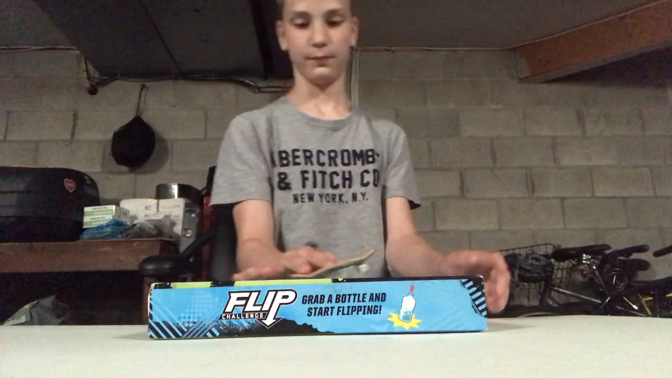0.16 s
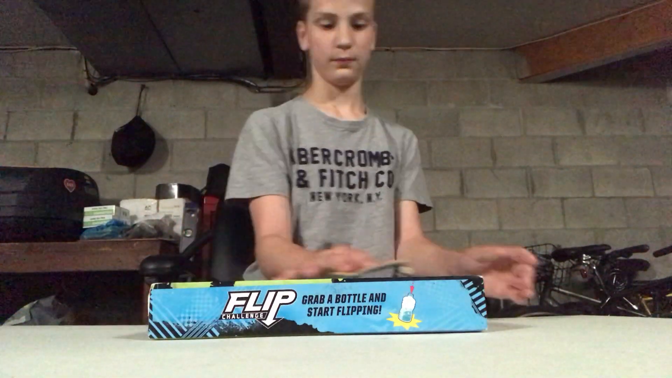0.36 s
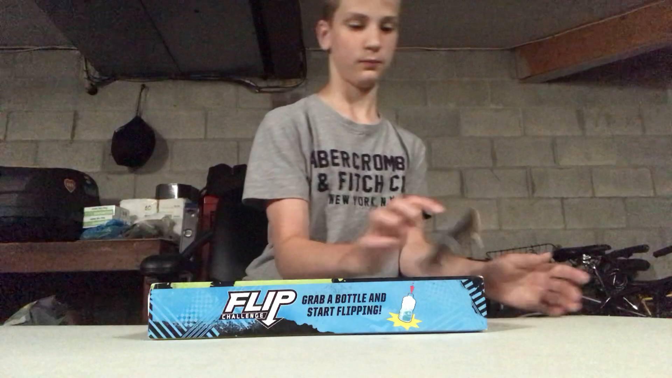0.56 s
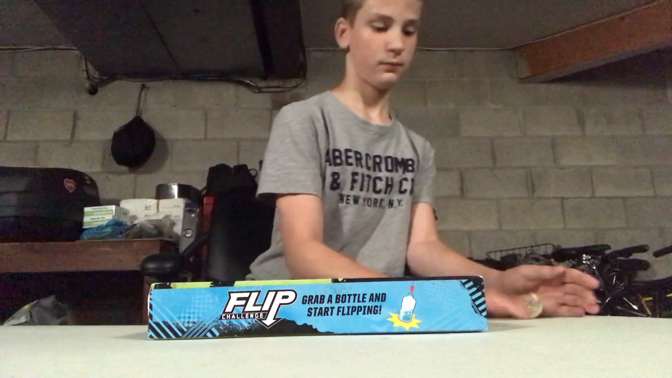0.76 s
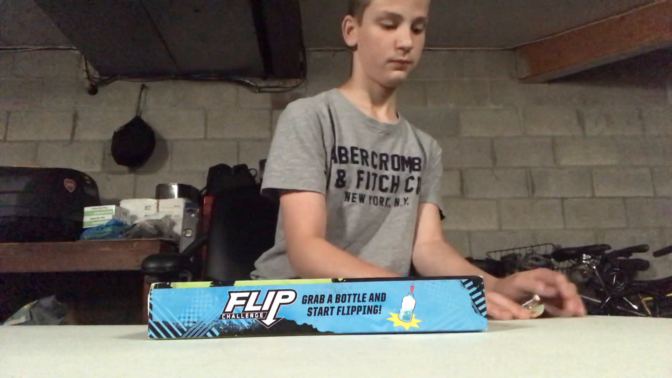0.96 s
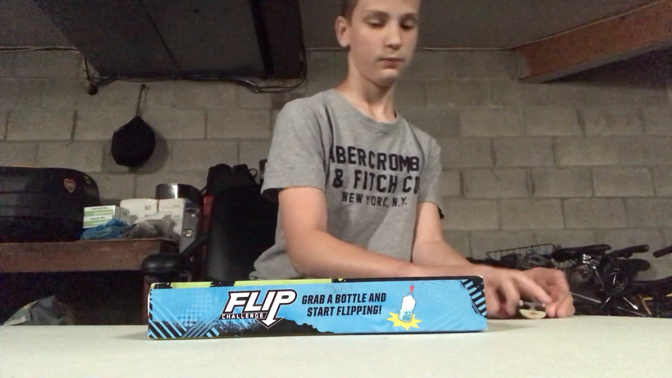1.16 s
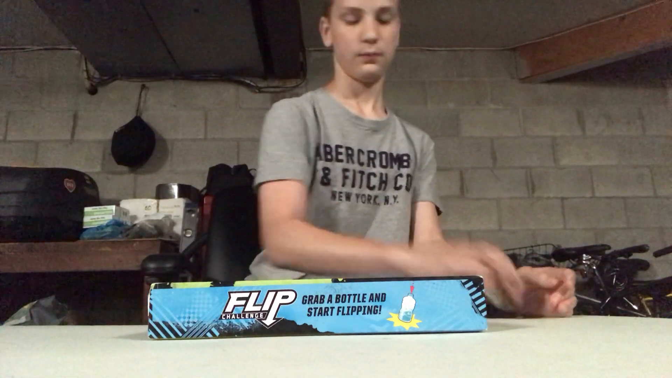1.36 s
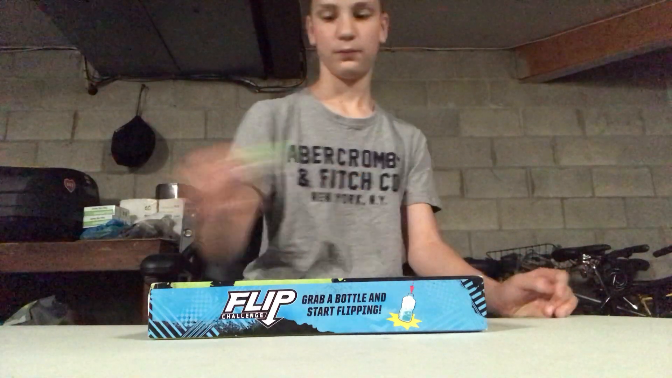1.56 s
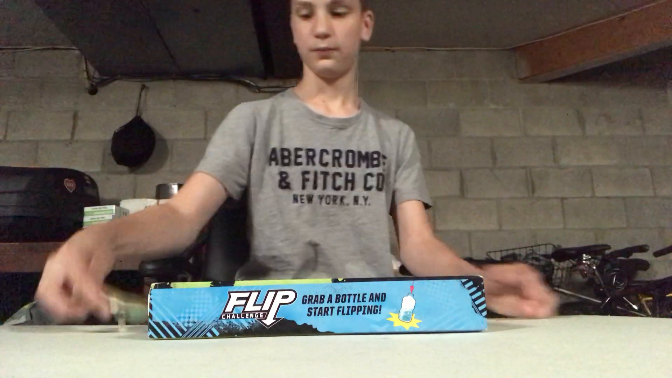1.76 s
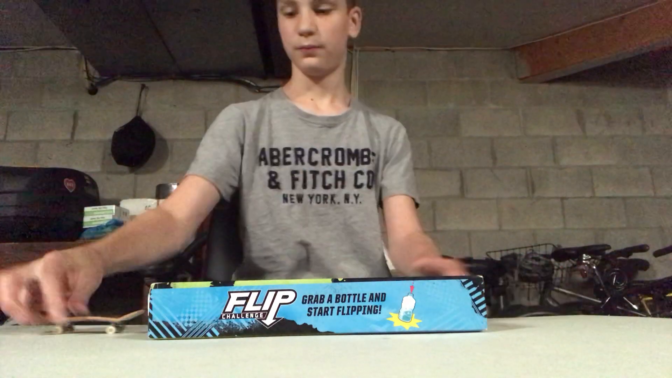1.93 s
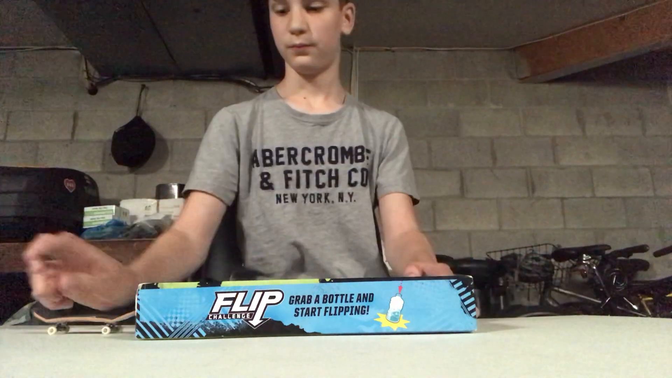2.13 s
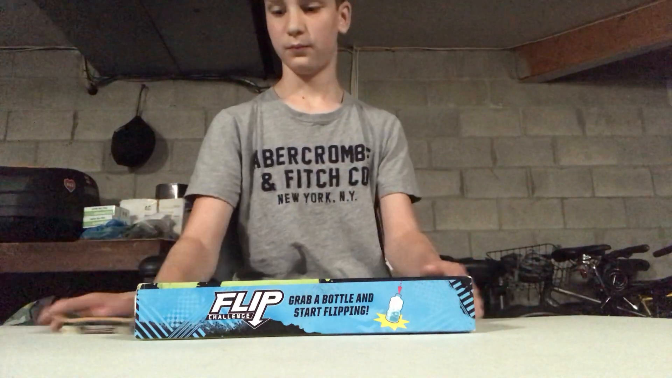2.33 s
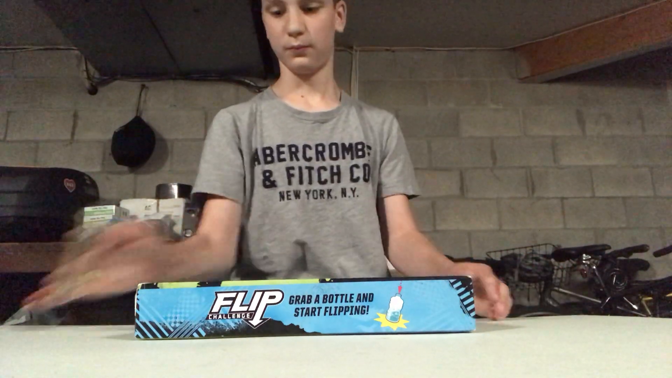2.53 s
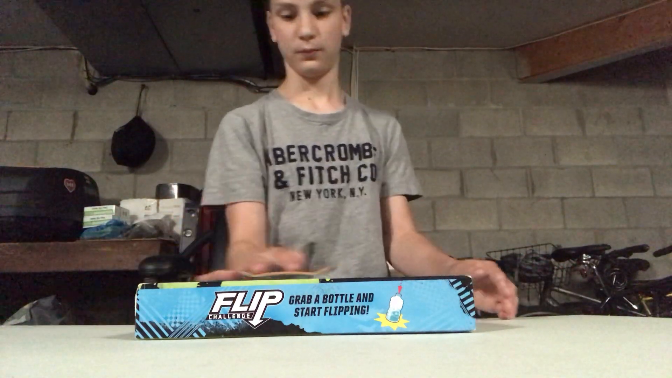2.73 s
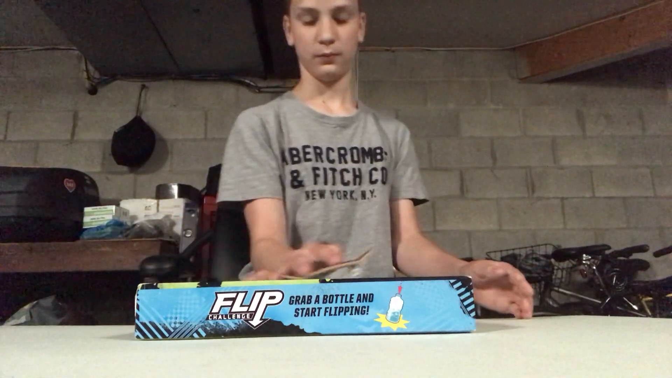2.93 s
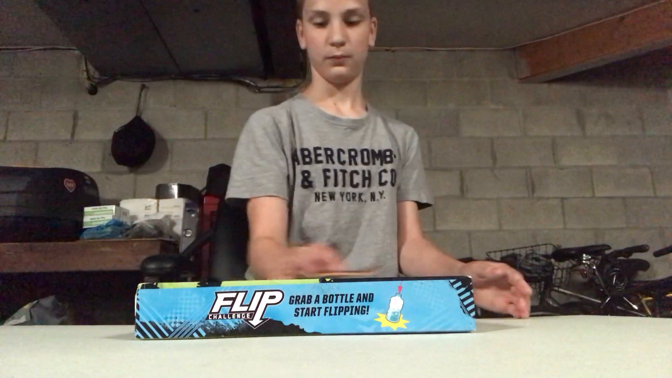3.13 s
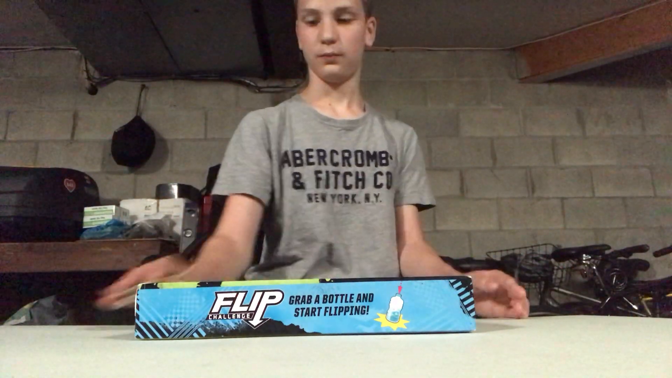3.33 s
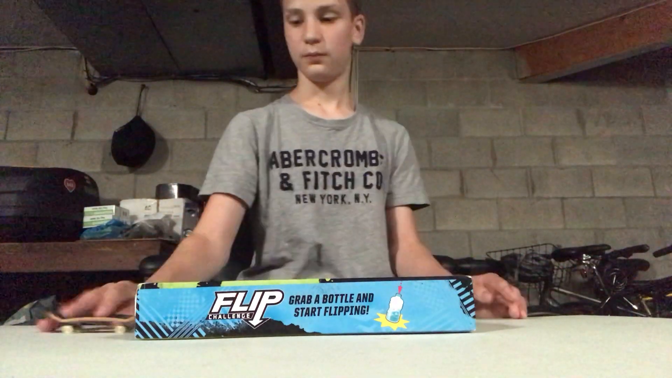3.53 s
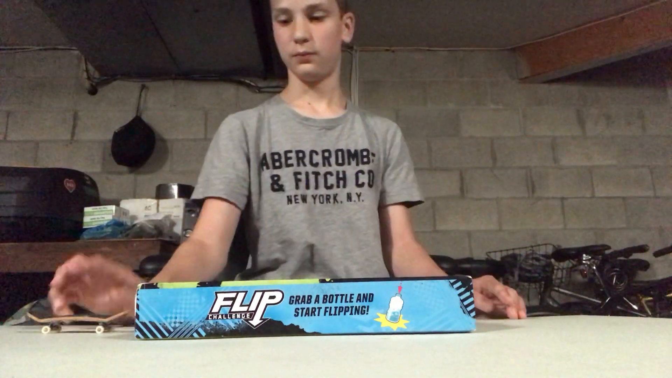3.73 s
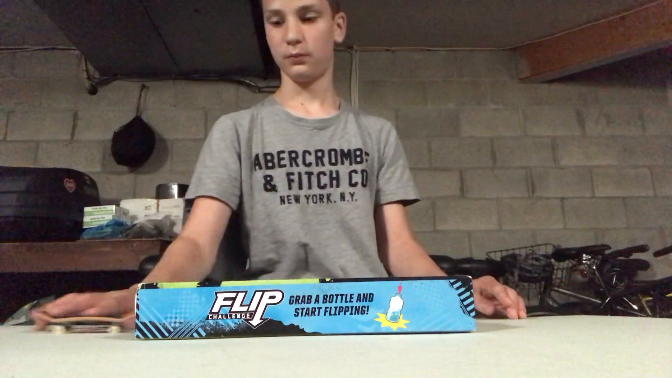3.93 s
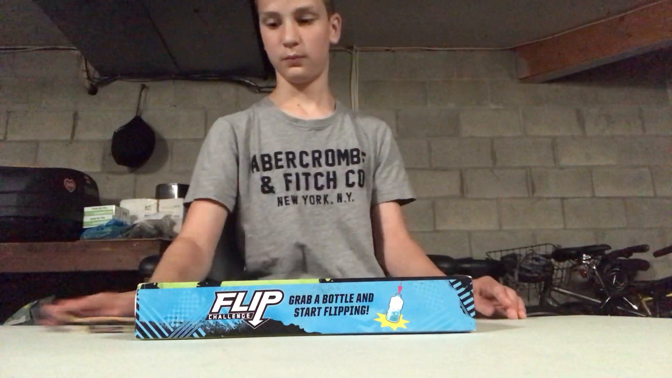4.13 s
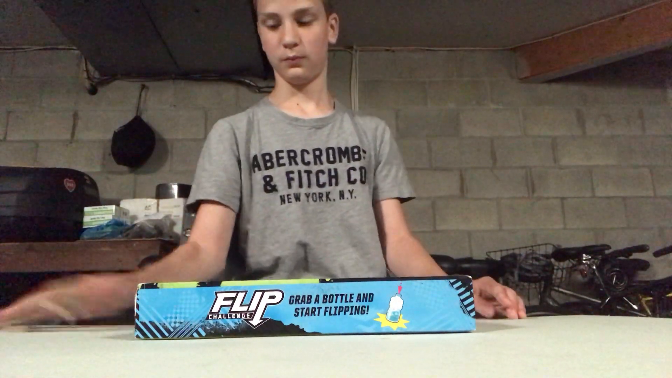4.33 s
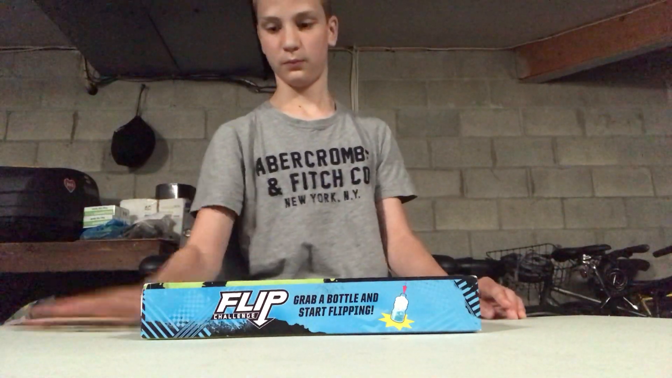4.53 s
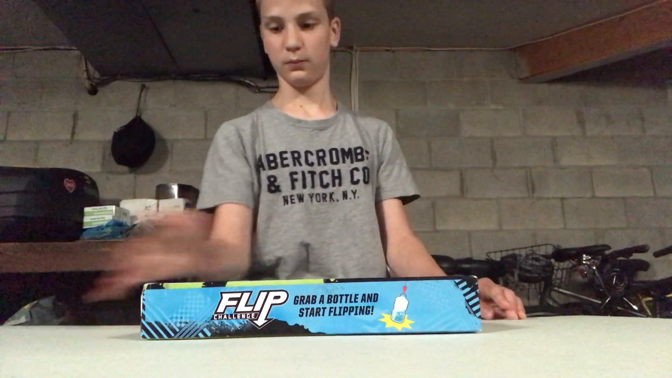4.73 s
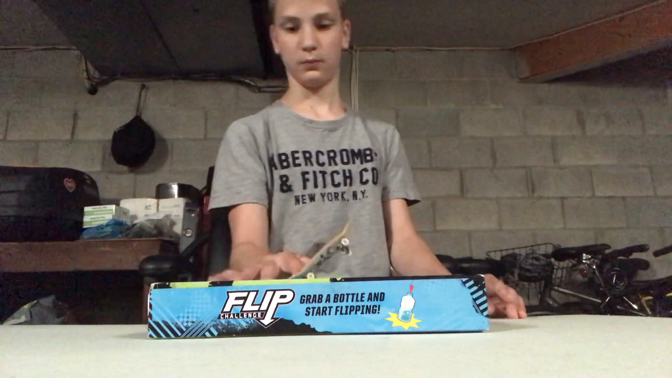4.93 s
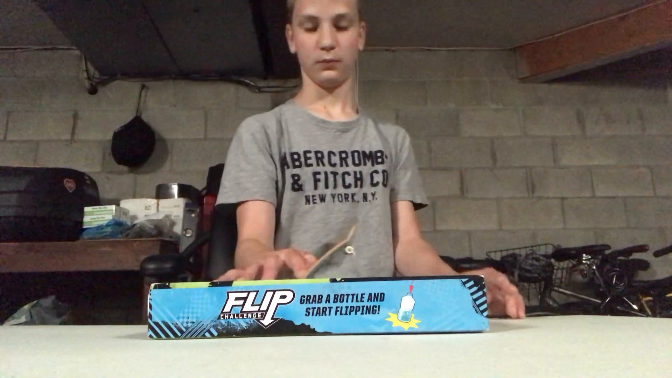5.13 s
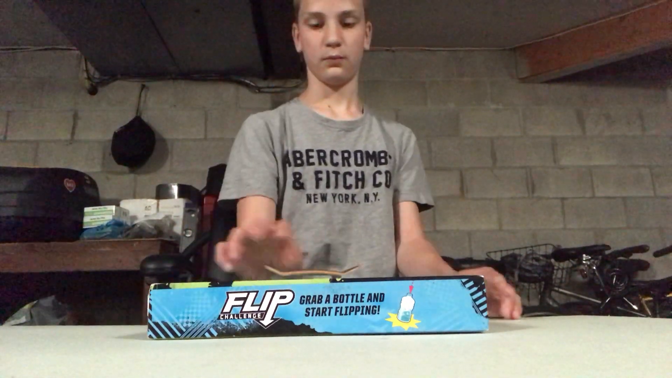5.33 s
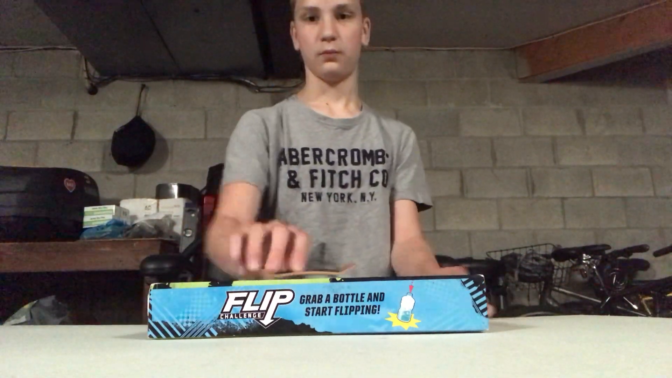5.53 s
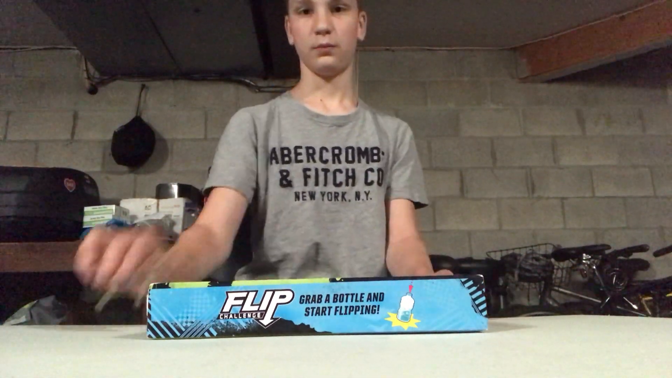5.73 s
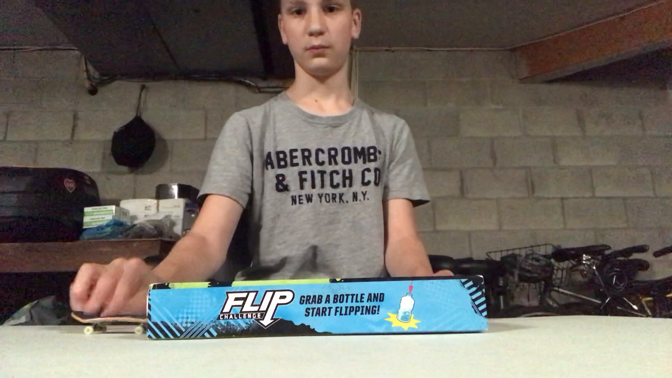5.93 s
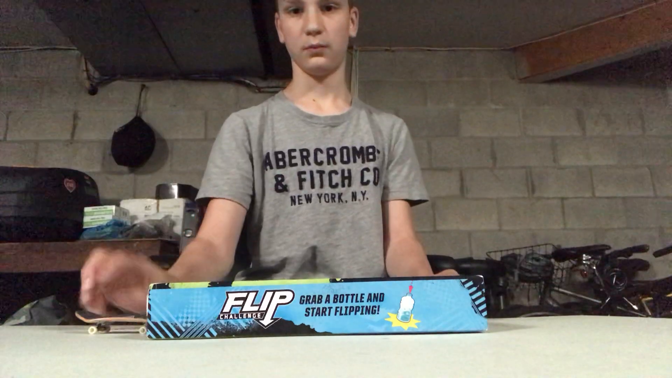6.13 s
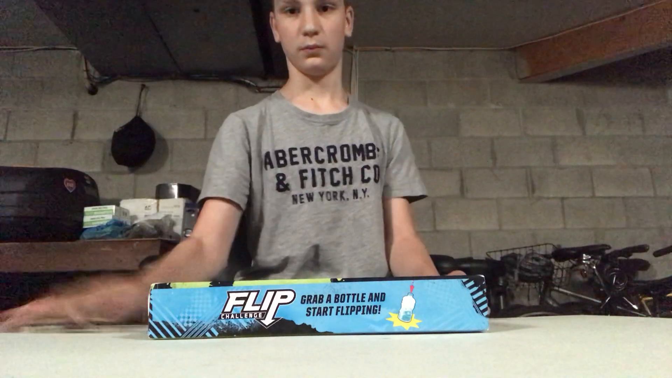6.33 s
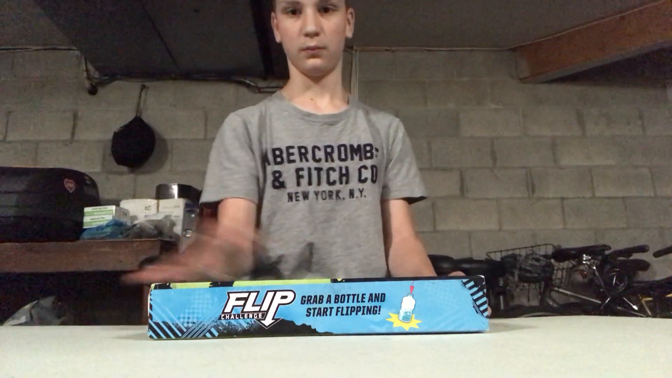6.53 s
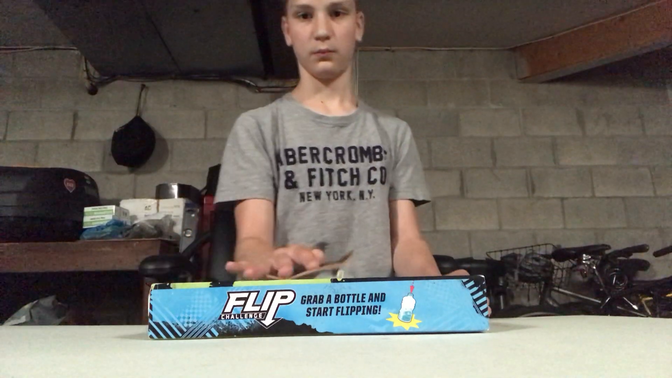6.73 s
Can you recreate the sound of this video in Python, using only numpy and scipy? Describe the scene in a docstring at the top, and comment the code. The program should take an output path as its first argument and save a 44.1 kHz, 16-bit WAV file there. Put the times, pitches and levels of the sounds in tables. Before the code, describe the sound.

Small hard deck and wheels clack on hollow cardboard and a table top, very near the phone. Two early bursts give way to a quiet gap with a gritty slide, soft hum and faint finger ticks. From just before two seconds, tricks come in uneven flurries of cracks, box knocks and dull thumps, joined by light touches and short hissing rolls, with hard basement echo and low room noise.

```python
"""A finger skateboard on a cardboard box and a table top, close to a phone in a concrete basement.
Still air lies under it all: noise bands. Three hits open at once, each a crack (noise burst, deck modes),
a knock and a late thump (modes); wheels (resonated grit noise) roll and rattle after them. More hits at 0.5-0.8 s;
an appliance hum (sine) swells just before 1 s, then sinks. Faint bright ticks of a finger rub near 1.3-1.65 s; from
1.8 s to the end, tricks with rolls, scrapes and light touches. Walls (decaying noise bands) ring on throughout."""
import sys
import numpy as np
from scipy import signal
from scipy.io import wavfile
from scipy.ndimage import uniform_filter1d

SR = 44100
rng = np.random.default_rng(int(sys.argv[2]) if len(sys.argv) > 2 else 0)


def pcm_store(signal):
    """Save signal as 16-bit PCM."""
    levels = np.round(np.clip(np.atleast_2d(signal), -1, 1) * 32767)
    wavfile.write(sys.argv[1], SR, levels.astype(np.int16).T)


N = 298719
T_S = np.arange(N) / SR

# still air, relative spectrum: f/Hz, density/dB per Hz
AIR_SPECTRUM = [(18, -36), (30, 10.5), (81, 0), (136, -24.5), (253, -12), (437, -20), (1030, -28),
                (2700, -38), (4540, -38.5), (15000, -50.5)]
# appliance hum over time: t/s, level/dB
HUM_LEVELS = [(0, -95), (.85, -67.5), (.95, -55), (1.75, -57.5), (1.9, -63.5), (6.77, -69)]
AIR_DB, HUM_HZ = -54, 89.4

# landings, tail pops, bounces, and faint bright ticks of a finger rub near 1.3-1.65 s:
# t/s, crack level/dB, knock level/dB, thump level/dB, favoured thump f/Hz, top level/dB re crack
HITS = [(0.0024, -31, -32, -26, 444, -4), (0.0308, -10, -25, -41, 461, -25),
        (0.043, -19, -28, -22.5, 397, -11), (0.535, -13.5, -27.5, -21.5, 359, -17),
        (0.7184, -4, -18, -19, 520, -15), (0.762, -11, -25, -18, 320, -2.5),
        (0.8145, -19.5, -50, -29, 560, -13), (0.819, -8.5, -40, -33, 245, -7.5),
        (0.8278, -13, -44, -31.5, 280, -20), (1.296, -40, -52, -58, 490, 6),
        (1.3639, -44, -55, -51, 318, 4.5), (1.404, -54, -70, -61, 303, 8), (1.42, -51, -68, -72, 300, 5),
        (1.6477, -51.5, -81, -66.5, 110, 4.5), (1.8421, -16.5, -25.5, -35.5, 121, 2),
        (1.948, -16, -33, -40, 118, -8), (2.364, -23, -30.5, -27.5, 150, -1),
        (2.5327, -12.5, -47, -27.5, 174, -7), (2.6947, -26, -28.5, -22.5, 494, -1),
        (2.7039, -19.5, -64.5, -38, 150, -16), (2.7473, -12, -28.5, -23.5, 282, -15.5),
        (2.7894, -31, -66, -53, 242, -17), (3.1723, -17, -33.5, -49, 361, -23),
        (3.288, -24, -77, -65, 326, -30), (3.3276, -24, -37, -60, 474, -30),
        (3.424, -28.5, -31.5, -22.5, 445, -8), (3.46, -10, -28, -44, 536, -6),
        (3.4815, -17, -28, -31.5, 146, -1), (3.893, -17, -30.5, -26, 168, -14.5),
        (4.3291, -18, -50, -29.5, 230, -2.5), (4.433, -6, -22, -24.5, 215, -9),
        (4.498, -15, -33, -34.5, 385, -30), (4.66, -10.5, -48, -26.5, 254, -4.5),
        (4.8512, -22.5, -36, -28.5, 345, -30), (4.8687, -23, -31, -27, 314, -23),
        (4.884, -20.5, -30.5, -34, 159, -28), (4.9012, -15.5, -22.5, -37, 293, -26),
        (4.919, -13, -54, -51, 347, -27), (4.9827, -18, -32.5, -33.5, 237, -26),
        (5.3376, -9.5, -26.5, -22.5, 355, -19), (5.3874, -18.5, -36, -32.5, 261, -31),
        (5.4914, -23, -37, -31.5, 326, -16), (5.8488, -10.5, -31, -38.5, 130, -6.2),
        (5.8823, -15, -30.5, -40, 141, -7.5), (6.2762, -14, -34, -33.5, 128, -11),
        (6.2976, -41, -49, -32.5, 360, -19), (6.3713, -21, -32.5, -61, 536, -28),
        (6.4342, -13, -43.5, -28.5, 134, -9), (6.617, -38, -34.5, -28.5, 426, -9),
        (6.6315, -12.5, -24, -31.5, 420, -15)]
# light touches while the fingers set the board up: t/s, crack level/dB, knock level/dB
TOUCHES = [(1.894, -24, -42.5), (2.2017, -43, -59.5), (2.2714, -54, -51), (2.3164, -50, -59),
           (2.4461, -33, -35.5), (3.137, -62, -55.5), (5.1056, -32, -42.5), (5.1414, -55, -49),
           (5.295, -52, -48), (5.65, -37, -54), (5.6944, -37, -53.5), (5.7425, -68, -50.5),
           (5.7902, -54, -60), (5.817, -64, -58), (6.0784, -61, -48), (6.134, -39, -55),
           (6.156, -53, -50.5), (6.2248, -46, -48.5)]
# modes of deck, of box wall, of box and table: f/Hz, relative level/dB, t60/s
DECK_MODES = [(3150, 5, 0.03), (3500, 3.5, 0.02), (4466, 11, 0.022), (5830, 0.5, 0.00077), (6550, -9, 0.02),
              (7760, -25.5, 0.0029)]
KNOCK_MODES = [(640, 3, 0.049), (836, -4.5, 0.022), (966, 3.5, 0.028), (1107, 1.5, 0.038),
               (1206, 0.5, 0.025), (1394, 2, 0.015), (1591, 3, 0.014), (1785, 0.5, 0.017),
               (2166, -9.5, 0.031)]
THUMP_MODES = [(80, -8, 0.069), (129.7, -6.5, 0.31), (155.4, 4.5, 0.13), (193, -10.5, 0.17),
               (250.7, 1, .06), (293, -4, 0.076), (354.6, 1, 0.078), (430.6, 1, 0.055), (476, 0.5, 0.026),
               (551.5, 2.5, 0.054)]
CRACK_FALL_S, TOP_FALL_S = 0.002, 0.0012
# touches: thump re knock, favoured thump pitch, top re crack
TOUCH_THUMP_DB, TOUCH_THUMP_HZ, TOUCH_TOP_DB = -0.8, 278, -20

# rolls, slides, rubs: t of peak/s, rise/s, fall/s, level/dB, hiss/dB re level, surface ring f/Hz, ring share/0-1
ROLLS = [(0.066, 0.028, 0.43, -52.5, -25, 1460, 0), (0.524, 0.25, 0.11, -44, -10.5, 1135, 0.5),
         (0.772, 0.028, 0.093, -39.5, -1, 1430, 0.5), (0.845, 0.054, 0.17, -44.5, 3, 1500, 0.06),
         (1.184, 0.2, 0.1, -49.5, -13, 590, 0.73), (1.293, 0.048, 0.13, -55.5, 5.5, 1540, .2),
         (1.317, 0.069, 0.11, -37, -15, 728, 0.26), (1.799, 0.089, 0.3, -64, 1, 1020, 0.25),
         (1.971, 0.14, 0.22, -50, -1.5, 590, 0.2), (2.441, 0.1, 0.062, -35.5, -9, 1290, 0.24),
         (2.488, 0.027, 0.097, -28.5, -8.5, 1110, 0.43), (2.719, 0.021, 0.025, -26, -13.5, 1040, 0.44),
         (2.783, 0.075, 0.2, -37, -16, 1064, 0.68), (3.227, 0.068, 0.053, -35, -20, 1010, 0.54),
         (3.311, 0.13, 0.1, -30.5, -14, 1072, 0.65), (3.485, 0.036, 0.14, -41, -6, 1470, 0.9),
         (4.048, 0.15, 0.18, -41, -10.5, 1336, 0.53), (4.253, 0.064, 0.086, -23.5, -8, 1373, 0.45),
         (4.39, 0.1, 0.11, -42, 0, 660, .43), (4.472, 0.062, 0.079, -24.5, -7, 1366, 0.78),
         (4.597, 0.055, 0.11, -23.5, -6, 1380, 0.68), (5.0, 0.012, 0.08, -70, -2, 690, 0.5),
         (5.319, 0.13, 0.033, -48.5, -23, 697, 0.56), (5.398, 0.022, 0.052, -37, -5, 1180, 0.2),
         (5.499, 0.035, 0.025, -35.5, -14, 1024, .35), (5.62, 0.07, 0.2, -54, -7.5, 1060, 0.1),
         (5.909, 0.11, 0.2, -47, -4.5, 533, 0.3), (6.295, 0.043, 0.048, -30.5, -9.5, 1320, 0.3),
         (6.383, 0.032, 0.089, -22.5, -5.5, 1370, 0.74)]
# wheel hiss resonances: f/Hz, width/Hz, relative level/dB
HISS_BANDS = [(2513, 1600, 9), (2980, 2500, 4.5), (3850, 520, 11), (4280, 1800, -4), (5270, 3800, -1.5),
              (7140, 1300, -5), (10000, 7700, -8.5), (12030, 3000, -29.5)]
# rumble re roll level, at a roll of -40.5 dB; rumble lost per dB of harder push
RUMBLE_DB, RUMBLE_LOSS_DB_PER_DB = -3, 0.47
# rattle after each row of HITS: level re knock, hiss and rumble re rattle
RATTLE_DB, RATTLE_HISS_DB, RATTLE_RUMBLE_DB = -7, -13, 1
RATTLE_RISE_S, RATTLE_FALL_S, RATTLE_RING_HZ, RATTLE_RING_SHARE = 0.016, 0.037, 1085, 0.35

# decay of the basement: f/Hz, t60/s
ROOM_DECAYS = [(150, 0.75), (400, 0.42), (1000, 0.72), (2500, 0.66), (6000, 0.4), (12000, 0.71)]
ROOM_DB = -15
TOP_CUT_HZ = 15750


def undb(db):
    """Decibels to amplitude ratio."""
    return 10 ** (np.asarray(db) / 20)


def level(x, db):
    """Scale to an rms level."""
    return x * undb(db) / np.sqrt(np.mean(x ** 2))


def band(x, hz, width_hz):
    """Resonance with gain 1 at its centre."""
    return signal.lfilter(*signal.iirpeak(hz, hz / width_hz, fs=SR), x)


def steep(x, hz, width_hz):
    """The resonance applied twice."""
    return band(band(x, hz, width_hz), hz, width_hz)


def bandpass(x, order, low_hz, high_hz):
    """Butterworth band-pass."""
    return signal.sosfilt(signal.butter(order, [low_hz, high_hz], "band", fs=SR, output="sos"), x)


def walk(rate_hz):
    """Random levels held 1 / rate_hz, smoothed twice, standard deviation 1."""
    hold = int(SR / rate_hz)
    steps = np.repeat(rng.standard_normal(N // hold + 1), hold)
    smooth = uniform_filter1d(uniform_filter1d(steps, hold), hold)[:N]
    return smooth / np.std(smooth)


def air():
    """Still room noise: half-octave-spaced bands, each wavering alone."""
    table_hz, table_db = np.transpose(AIR_SPECTRUM)
    noise = np.zeros(N)
    for hz in 40 * 2 ** np.arange(0, 8.6, 0.5):
        db = np.interp(np.log(hz), np.log(table_hz), table_db) + 0.62 * walk(5.4)
        noise += undb(db) * steep(rng.standard_normal(N), hz, hz / 2)
    return level(noise, AIR_DB)


def appliance_hum():
    """One sine that comes and goes, with a slight random waver."""
    db = np.interp(T_S, *np.transpose(HUM_LEVELS)) + 1.1 * walk(5.6)
    return undb(db) * np.sqrt(2) * np.sin(2 * np.pi * HUM_HZ * T_S)


def ring(modes, t, late_s, rise_s, scatter_db, detune, focus_db=0):
    """One blow on a set of modes, rms 1 over the first 12 ms; bending waves bring the low modes later."""
    hz, db, t60_s = np.array(modes).T[:, :, None]
    pitch_draw, level_draw, sign_draw = rng.standard_normal((len(modes), 3)).T[:, :, None]
    since = np.clip(t - late_s * (hz[-1] / hz - 1), 0, None)
    shape = (1 - np.exp(-since / rise_s)) * np.exp(-np.log(1000) * since / t60_s)
    wave = np.sin(2 * np.pi * hz * (1 + detune * pitch_draw) * since + np.pi * (sign_draw > 0))
    out = np.sum(undb(db + focus_db + scatter_db * level_draw) * shape * wave, axis=0)
    return out / np.sqrt(np.mean(out[:SR // 80] ** 2))


def burst(t, low_hz, high_hz, fall_s):
    """A spit of noise and weaker rebounds of loose wheels within 16 ms, peak 1."""
    late, size = rng.uniform(size=(2, 3, 1))
    since = t - 0.016 * late
    rebounds = np.sum(0.22 * size * (since > 0) * np.exp(-np.abs(since) / fall_s), axis=0)
    first = (1 - np.exp(-t / 0.00027)) * np.exp(-t / fall_s)
    out = bandpass(rng.standard_normal(len(t)) * (first + rebounds), 3, low_hz, high_hz)
    return out / np.max(np.abs(out))


def spread(sound, low_hz, high_hz):
    """Band-limited click of the same energy: what a blow sends in all directions together."""
    click = bandpass(signal.unit_impulse(len(sound)), 2, low_hz, high_hz)
    return click * np.sqrt(np.sum(sound ** 2) / np.sum(click ** 2))


def hits_and_touches():
    """Deck crack, box-wall knock, thump of box and table; row 0 goes to the phone, row 1 to the walls."""
    out, t = np.zeros((2, N + SR)), T_S[:SR // 4]
    touches = [(s, crack_db, knock_db, knock_db + TOUCH_THUMP_DB, TOUCH_THUMP_HZ, TOUCH_TOP_DB)
               for s, crack_db, knock_db in TOUCHES]
    for s, crack_db, knock_db, thump_db, thump_hz, top_db in HITS + touches:
        deck_ring = 0.025 * ring(DECK_MODES, t, 0, 0.00023, 3.0, 0.03)
        crack = undb(crack_db) * (deck_ring + 0.53 * burst(t, 2100, 5550, CRACK_FALL_S))
        top = undb(crack_db + top_db) * burst(t, 5200, 12800, TOP_FALL_S)
        knock = undb(knock_db) * ring(KNOCK_MODES, t, 0.00035, 0.0004, 8.6, 0.037)
        # the spot struck favours modes near one pitch; dB per octave away
        focus_db = -14.0 * np.abs(np.log2(np.array(THUMP_MODES)[:, :1] / thump_hz))
        thump_t = np.clip(t - 0.0012, 0, None)
        thump = undb(thump_db) * ring(THUMP_MODES, thump_t, 0.0015, 0.00077, 2.5, 0.049, focus_db)
        near = crack + top + knock + thump
        around = spread(crack, 2500, 7000) - spread(top, 7000, 13000) - spread(knock, 550, 1800) + 0.56 * thump
        out[:, int(s * SR):][:, :len(t)] += [near, around]
    return out[:, :N]


def scrapes():
    """Rolls and rattles: peak t/s, rise/s, fall/s, level/dB, hiss/dB, rumble/dB, ring f/Hz, ring share."""
    rolls = [(s, rise_s, fall_s, db, hiss_db, RUMBLE_DB - RUMBLE_LOSS_DB_PER_DB * (db + 40.5), hz, share)
             for s, rise_s, fall_s, db, hiss_db, hz, share in ROLLS]
    rattles = [(hit[0] + RATTLE_RISE_S, RATTLE_RISE_S, RATTLE_FALL_S, hit[2] + RATTLE_DB,
                RATTLE_HISS_DB, RATTLE_RUMBLE_DB, RATTLE_RING_HZ, RATTLE_RING_SHARE) for hit in HITS]
    return rolls + rattles


def shaken(grit, resonances):
    """Grit through (f/Hz, width/Hz, level/dB) resonances of alternating sign, rms 1."""
    parts = [(-1) ** k * undb(db) * steep(grit, hz, width_hz) for k, (hz, width_hz, db) in enumerate(resonances)]
    return level(sum(parts), 0)


def wheels():
    """Grit under small wheels: dense grains of uneven size shake the same box and table modes."""
    grit = rng.standard_normal(N) * undb(0.67 * rng.exponential(size=N) + 2.43 * walk(150))
    body = shaken(grit, [(hz, 9.54 / t60_s, db) for hz, db, t60_s in KNOCK_MODES])
    rumble = shaken(grit, [(hz, 5.36 / t60_s, db) for hz, db, t60_s in THUMP_MODES])
    hiss = shaken(grit, HISS_BANDS)
    out = np.zeros(N)
    for peak_s, rise_s, fall_s, db, hiss_db, rumble_db, hz, share in scrapes():
        start_s, end_s = peak_s - rise_s, peak_s + fall_s
        on = slice(max(int(start_s * SR), 0), int(end_s * SR))
        away = np.interp(T_S[on], [start_s, peak_s, end_s], [1, 0, 1])
        share = np.clip(share, 0, 1)
        surface = level(steep(grit[on], hz, 0.22 * hz), 0)
        ringing = np.sqrt(1 - share) * body[on] + np.sqrt(share) * surface
        # slower is duller: less hiss away from the peak
        sound = ringing + undb(hiss_db - 1.33 * away) * hiss[on] + undb(rumble_db) * rumble[on]
        bend = np.where(T_S[on] < peak_s, 1.6, 1.2)
        out[on] += undb(db - 25.3 * away ** bend) * sound  # the push swells and dies away
    return out


def basement(x):
    """Dense echoes of concrete walls: noise bands, each dying at its own rate."""
    t, tail = T_S[:SR], np.zeros(SR)
    for hz, t60_s in ROOM_DECAYS:
        noise = steep(rng.standard_normal(SR), hz, 1.62 * hz)
        tail += noise * hz ** -0.4 * np.exp(-np.log(1000) * t / t60_s)
    tail *= 1 - np.exp(-t / 0.00067)  # soft onset
    return signal.fftconvolve(x, tail / np.sqrt(np.sum(tail ** 2)))[:N]


def scene():
    """Air and hum, board near the phone, its echo."""
    background = air() + appliance_hum()
    near, around = hits_and_touches()
    rolling = wheels()
    echo = undb(ROOM_DB) * basement(around + rolling)
    return (background + near + rolling + echo)[None]


def record(dry):
    """The phone drops the deepest bass, dips twice in the treble and cuts the top."""
    body = signal.sosfilt(signal.butter(N=7, Wn=43, btype="high", fs=SR, output="sos"), dry)
    body = body - 0.5 * band(body, 10400, 1300) - 0.42 * band(body, 13900, 3600)
    return signal.sosfilt(signal.ellip(8, 0.2, 70, TOP_CUT_HZ, fs=SR, output="sos"), body)


dry = scene()
out = record(dry)
pcm_store(out)
```